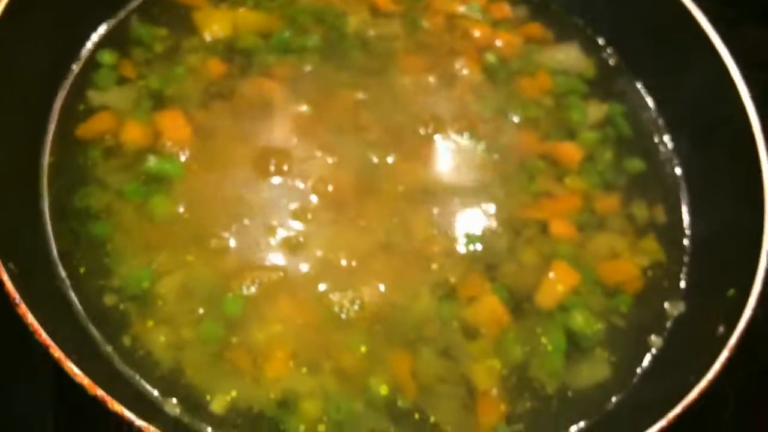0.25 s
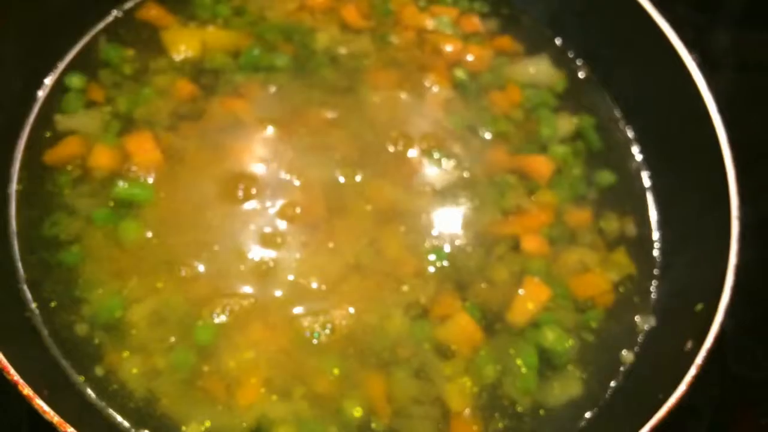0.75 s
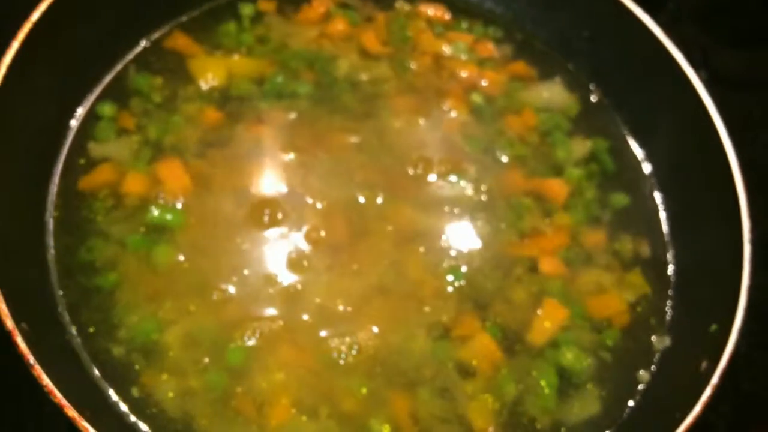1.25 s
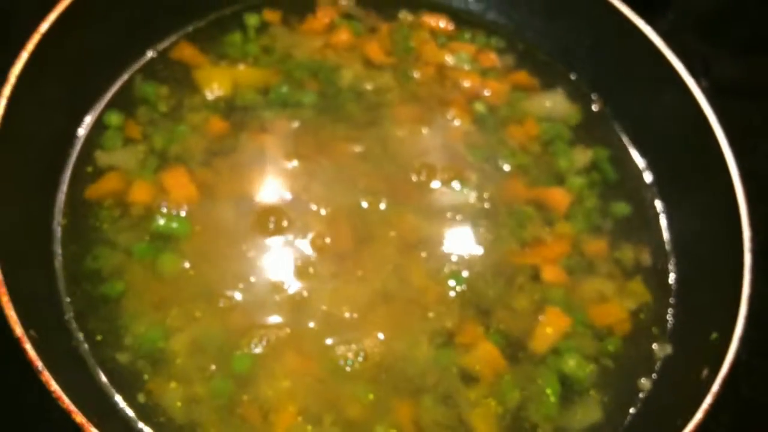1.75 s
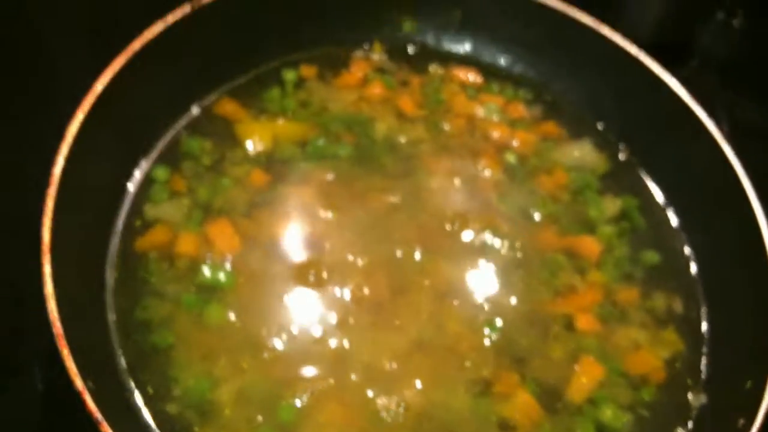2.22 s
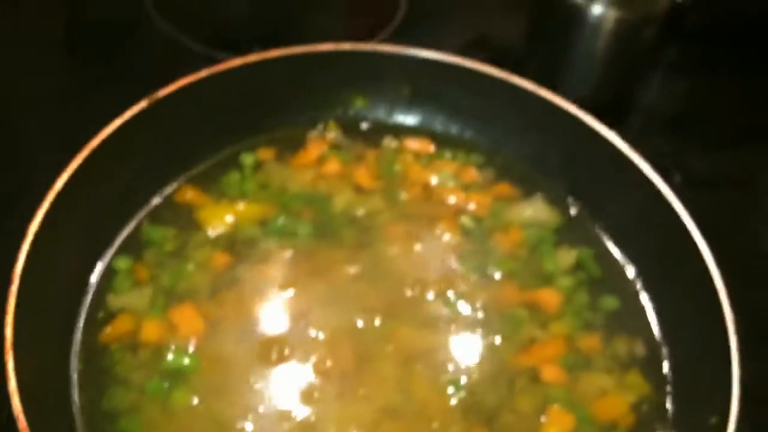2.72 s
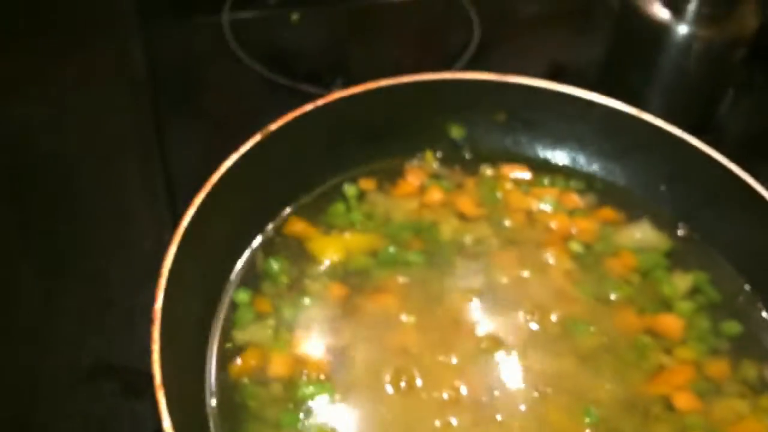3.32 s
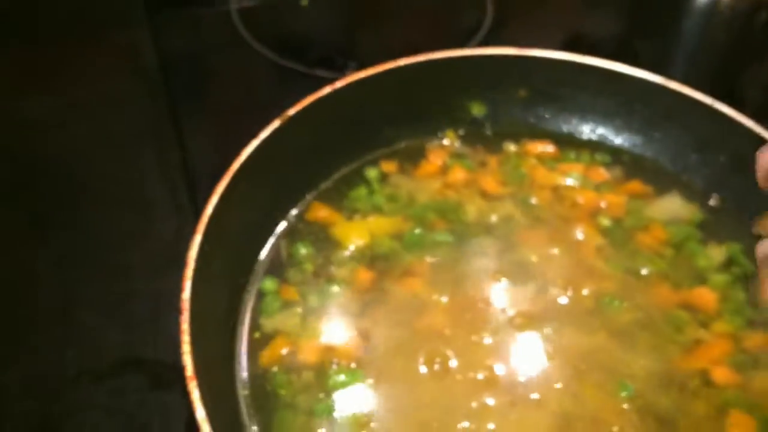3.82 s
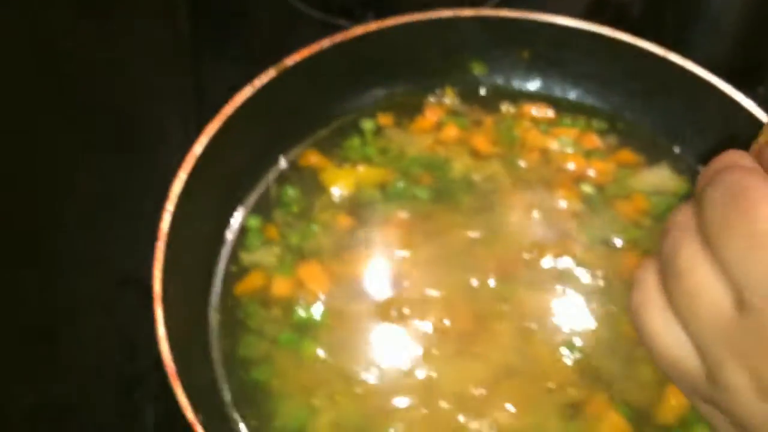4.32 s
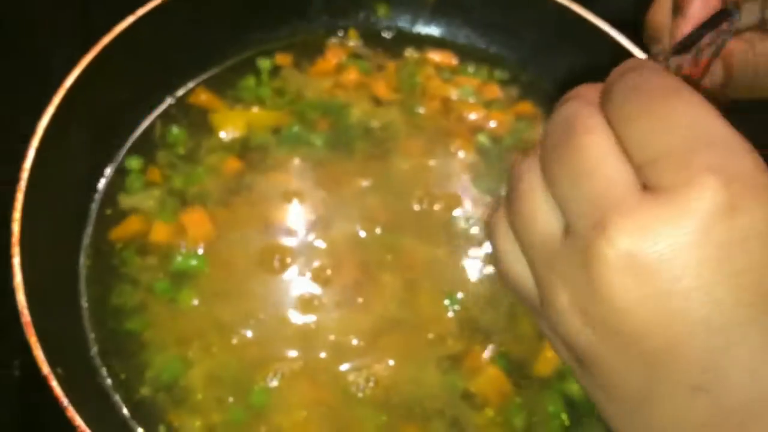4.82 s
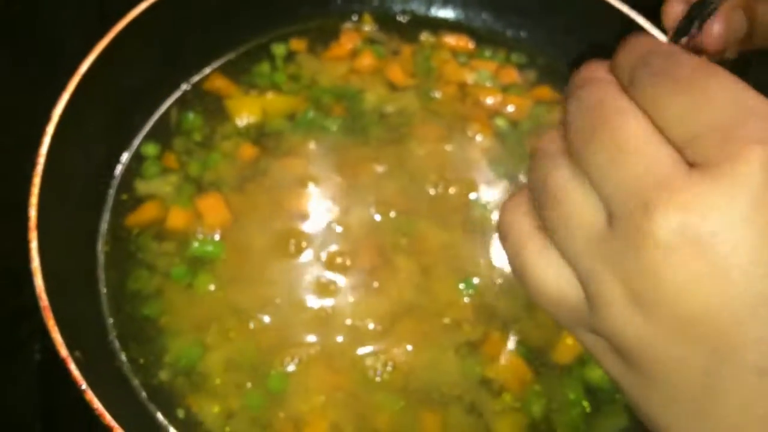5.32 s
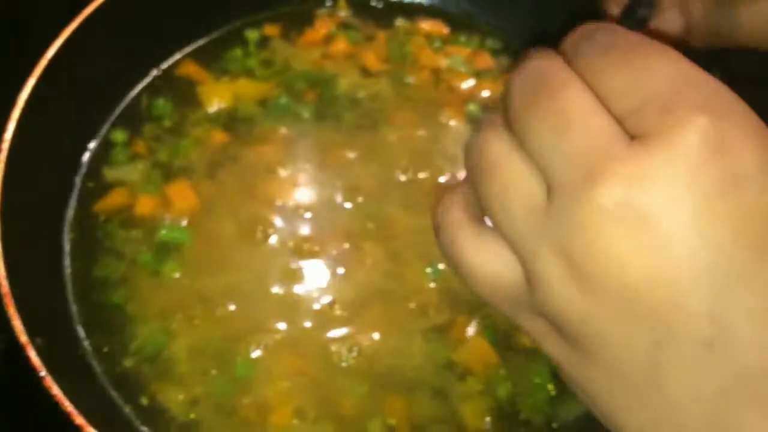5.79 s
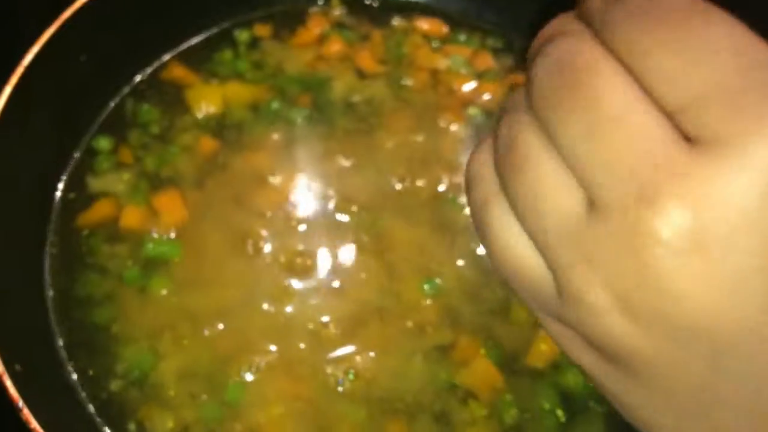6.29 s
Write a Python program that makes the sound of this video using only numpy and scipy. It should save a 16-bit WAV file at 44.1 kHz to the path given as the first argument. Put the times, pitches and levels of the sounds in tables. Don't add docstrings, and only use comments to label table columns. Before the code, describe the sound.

Close, slightly rough phone pickup of a foil packet being opened beside a gently bubbling pan. Quiet rumble and faint shoe scuffs, scattered crisp creases, then the loudest moment: hard foil slaps and dull knocks jolting a small tin. After a calmer stretch of rustle and separate clicks, the seam rips in bright snaps, ending with brittle shaking and short room echoes.

```python
import sys
import numpy as np
from scipy import signal
from scipy.fft import rfft, irfft, next_fast_len
from scipy.io import wavfile
from scipy.ndimage import uniform_filter1d, map_coordinates

SR = 44100
rng = np.random.default_rng(int(sys.argv[2]) if len(sys.argv) > 2 else 0)


def generate_wav(signal):
    frames = np.transpose(np.atleast_2d(signal))
    scaled = np.clip(frames, -1, 1) * 32767
    pcm = np.round(scaled).astype(np.int16)
    wavfile.write(sys.argv[1], SR, pcm)


def ratio_of_db(decibels):
    return 10 ** (np.asarray(decibels, float) / 20)


N = 288849
MIDDLE_HZ = 5000

# (time [s], level [dB])
RUMBLE = [(0, -67.5), (1, -69), (1.28, -70), (1.5, -71), (2.5, -65), (5.5, -67.5), (6.1, -71.5)]


def unit(x):
    return x / np.sqrt(np.mean(x ** 2, -1, keepdims=True) + 1e-20)


def along(points, hz):
    f, v = np.transpose(points)
    return np.interp(np.log(hz + 1), np.log(f + 1), v)


def curve(rows):
    s, v = np.transpose(rows)
    return np.interp(np.arange(N) / SR, s, v)


def wobble(rate_hz):
    knots = rng.standard_normal(int(N * rate_hz / SR) + 4)
    return map_coordinates(knots, [np.arange(N) * rate_hz / SR])


def noise(gain, size, count=1):
    spectrum = rfft(rng.standard_normal((count, size)))
    shaped = irfft(spectrum * gain(np.fft.rfftfreq(size, 1 / SR)), size)
    return np.squeeze(unit(shaped))


def modes(table):
    def gain(f):
        total = 0
        for k, (hz, width_hz, db) in enumerate(table):
            damping = 1j * f * width_hz
            total = total + (-1) ** k * ratio_of_db(db) * damping / (hz * hz - f * f + damping)
        return total
    return gain


def decay(t, t60_s):
    return ratio_of_db(-60 * t / t60_s)


def onset(t, rise_s):
    return 1 - np.exp(-t / rise_s)


def fade(t60s, hz, t):
    return decay(t, np.maximum(along(t60s, hz), .01)[:, None])


def add(track, s, sound):
    part = track[round(s * SR):][:len(sound)]
    part += sound[:len(part)]


def kitchen():
    # (frequency [Hz], width [Hz], level [dB])
    hum_lines = [(56.6, 12, -77), (137.3, 7, -76.5), (185.1, 2.3, -71.5)]
    # (frequency [Hz], density [dB per Hz])
    low_colour = [(12, -47.5), (20, -27), (43, 1.5), (187, -6), (211, -13.5), (500, -25), (650, -55.5),
                  (1100, -120)]
    # (frequency [Hz], density [dB per Hz])
    air_colour = [(120, -28), (200, -7), (659, -21), (836, -17), (1000, -17), (1740, -27.5), (13600, -36.5),
                  (16000, -42)]
    size, t = next_fast_len(N), np.arange(N) / SR
    rumble = ratio_of_db(curve(RUMBLE) + 0.8 * wobble(4.4))
    rumble *= noise(lambda f: ratio_of_db(along(low_colour, f)), size)[:N]
    hum = np.zeros(N)
    for hz, width_hz, db in hum_lines:
        unsteady = noise(lambda f: 1 / (1 + ((f - hz) / width_hz) ** 2), size)[:N]
        steady = ratio_of_db(1) * np.sin(2 * np.pi * hz * t)
        hum += ratio_of_db(db) * (0.65 * unsteady + steady)
    air = ratio_of_db(curve(RUMBLE) / 2 - 38.0 + 1.2 * wobble(3))
    air *= noise(lambda f: ratio_of_db(along(air_colour, f)), size)[:N]
    return rumble + hum + air


def simmer():
    draw, t = rng.random((400, 3)), np.arange(1024) / SR
    hz = 380 * 5.2 ** draw[:, 1:2]
    bubbles = np.sin(2 * np.pi * hz * t * (1 + 0.0088 * hz * t))
    bubbles *= hz * t * np.exp(-hz * t / 1.6) * ratio_of_db(-14 * draw[:, 2:])
    at = (draw[:, :1] * N).astype(int) + np.arange(len(t))
    track = np.bincount(at.ravel(), bubbles.ravel(), minlength=N)[:N]
    return ratio_of_db(curve(RUMBLE) - 14) * unit(track)


def pan_tones():
    # (time [s], length [s], level [dB], frequency [Hz])
    tones = [(.051, 0.15, -63, 85.1), (.271, .072, -54.5, 112.1), (1.356, .033, -53.1, 201),
             (2.411, .04, -46, 193), (2.703, 0.031, -46, 137.1), (2.792, 0.074, -50.1, 113.1),
             (2.861, .068, -48, 166.1), (3.187, .015, -61, 1051), (3.189, .018, -65, 1394),
             (3.201, .036, -62, 316), (3.422, .079, -57.5, 75.1), (3.601, .071, -62, 80.1),
             (4.001, .081, -66, 321), (4.561, .078, -70.5, 351), (4.971, .071, -57.5, 72.5),
             (5.03, 0.045, -71, 628)]
    out, t = np.zeros(N), np.arange(8192) / SR
    for s, length_s, db, hz in tones:
        swell = np.sin(np.pi * np.minimum(t / length_s, 1))
        add(out, s, ratio_of_db(db) * swell * np.sin(2 * np.pi * hz * t * (1 - .03 * t)))
    return out


def scuffs():
    # (time [s], length [s], level [dB])
    slides = [
        (0, 0.031, -61.5),
        (0.103, 0.054, -69),
        (0.215, 0.15, -65.5),
        (0.505, 0.22, -68.5),
        (0.681, 0.17, -73),
        (1.1, 0.16, -72),
        (1.416, 0.072, -60),
        (1.905, .08, -77),
        (3.183, 0.088, -63.5),
    ]
    # (frequency [Hz], width [Hz], level [dB])
    sole = [(1910, 420, 2.5), (2470, 410, 0.5), (3150, 390, -2.5), (4300, 130, -7), (6000, 160, -3)]
    out, t = np.zeros(N), np.arange(16384) / SR
    for s, length_s, db in slides:
        envelope = ratio_of_db(db - 17 * t / length_s) * onset(t, 0.0084)
        add(out, s, envelope * noise(modes(sole), len(t)))
    return out


def knocks():
    # (time [s], thump level [dB], thump frequency [Hz], board level [dB], t60 [s])
    blows = [(0.261, -40, 237, -14, 0.042), (1.212, -43.5, 280, -17, 0.14), (1.262, -42, 280, -20, 0.077),
             (1.329, -41, 280, -9.5, 0.097), (2.4008, -36, 173, 2, 0.39), (2.425, -39, 205, 0.5, 0.34),
             (2.488, -40.5, 165, 13.5, 0.47), (2.519, -39, 304, 6.5, 0.26), (2.719, -26.5, 207, 3.5, 0.063),
             (2.735, -23.5, 145, 1.5, 0.15), (2.741, -33.5, 101, -16, 0.22), (2.777, -41, 328, 5, 0.066),
             (2.861, -46.5, 150, -16.5, 0.11), (3.184, -53.5, 314, -0.5, 0.42),
             (3.449, -44.5, 183, -29, 0.12), (3.943, -42.5, 113, -15.5, 0.13),
             (5.178, -57, 840, 5.5, 0.087), (5.365, -49, 466, -12, 0.092), (5.424, -47.5, 248, -25, 0.11),
             (5.536, -57, 694, 4, 0.16), (5.808, -52, 245, 8.5, 0.094), (6.368, -59, 474, 9, 0.16)]
    # (frequency [Hz], width [Hz], level [dB])
    board_modes = [(490, 174, -4), (676, 114, -0.5), (840, 111.5, -2.5), (940, 64, -6), (1620, 87, -24)]
    # (frequency [Hz], width [Hz], level [dB])
    room_modes = [(116, 51, -10.5), (165, 38.5, 1.5), (280, 177, -8.5)]
    out, t = np.zeros(N), np.arange(16384) / SR
    for s, db, hz, board_db, t60_s in blows:
        thump = np.sin(2 * np.pi * hz * t) * decay(t, 0.49 * t60_s) * onset(t, 0.0022)
        board = np.zeros(len(t))
        for mode_hz, width_hz, mode_db in board_modes:
            level = ratio_of_db(mode_db + rng.normal(0, 1)) * decay(t, 0.12 * t60_s + 2 / width_hz)
            board += level * np.sin(2 * np.pi * mode_hz * rng.normal(1, 0.011) * t)
        board *= 0.52 * ratio_of_db(board_db) * onset(t, 0.00093)
        low = noise(modes(room_modes), len(t)) * decay(t, 0.16 + t60_s) * onset(t, 0.0044)
        mid = noise(modes(board_modes), len(t))
        mid *= decay(t, 0.6 * t60_s) + 0.064 * decay(t, 0.284)
        murmur = (0.27 * low + 0.33 * ratio_of_db(board_db) * mid) * onset(t, 0.0017)
        add(out, s, ratio_of_db(db + 1.0) * (thump + board + murmur))
    return out


def tin():
    # (frequency [Hz], level [dB], t60 [s])
    tin_modes = [(684, -3, 0.098), (3000, -6, 0.1), (4000, -14, .1), (4136, -4, 0.077), (4635, -14, 0.072),
                 (4970, -7.5, 0.074), (6000, -4, .08), (6900, -5, .08), (7420, -12, 0.09)]
    # (time [s], level [dB], frequency struck best [Hz])
    jolts = [
        (2.4016, -36.5, 4160),
        (2.4254, -40, 4060),
        (2.488, -30.5, 4030),
        (2.519, -30, 5000),
        (2.7385, -28.5, 727),
        (2.7195, -43, 940),
    ]
    out, t = np.zeros(N), np.arange(8192) / SR
    for s, db, best_hz in jolts:
        ring = np.sin(2 * np.pi * best_hz * t) * decay(t, .045)
        for hz, level_db, t60_s in tin_modes:
            octaves_off = abs(np.log2(hz / best_hz))
            tone = np.sin(2 * np.pi * (hz * t + rng.random()))
            ring += ratio_of_db(level_db - 8.8 * octaves_off) * decay(t, t60_s) * tone
        add(out, s, ratio_of_db(db) * ring * onset(t, 0.00091))
    return out


def powder():
    # (frequency [Hz], density [dB per Hz])
    grain_colour = [(400, -31), (900, -5), (1700, -4.5), (2400, -13.5), (6000, -32)]
    start_s, rise_s, fall_s, level_db = 3.59, .04, .11, -52.5
    out, t = np.zeros(N), np.arange(16384) / SR
    envelope = onset(t, rise_s) ** 2 * np.exp(-t / fall_s)
    swish = noise(lambda f: ratio_of_db(along(grain_colour, f)), len(t))
    add(out, start_s, ratio_of_db(level_db) * envelope * swish)
    return out


def rustle():
    # (time [s], level [dB])
    movement = [(0.0, -74), (0.8, -68), (1.12, -77), (1.45, -64), (1.62, -73), (1.67, -66), (1.75, -78),
                (1.87, -62), (2.06, -62), (2.26, -73), (2.61, -63.5), (2.98, -71), (3.45, -64), (4.74, -66),
                (5.1, -73), (5.5, -65), (5.84, -71), (6.02, -66.5), (6.55, -67.5)]
    # (frequency [Hz], density [dB per Hz])
    foil_colour = [(1000, -1.5), (2200, 4.5), (4000, 1.5), (8000, 0), (15000, -4)]
    ticks_per_s = 900
    ticks = (rng.random(N) < ticks_per_s / SR) * ratio_of_db(3 * rng.exponential(size=N))
    spray = signal.lfilter([1], [1, -.96], ticks)
    gate = unit(2.4 + unit(spray)) * ratio_of_db(0.75 * wobble(29))
    hiss = noise(lambda f: ratio_of_db(along(foil_colour, f)), next_fast_len(N))[:N]
    return ratio_of_db(curve(movement) - 5.0) * gate * hiss


def panel_rings():
    # (time [s], level [dB], frequency [Hz])
    panels = [(0.9644, -37, 5500), (1.298, -45, 8480), (2.0178, -40, 3230), (2.0178, -32, 2560),
              (2.0254, -32, 2600), (2.0254, -34, 5960), (2.4035, -31, 664), (2.4017, -31, 4640),
              (2.4257, -34, 4010), (2.4878, -23.5, 1690), (2.4878, -15.5, 4000), (2.5185, -15, 6970),
              (2.5185, -17.5, 4850), (2.7281, -36, 2370), (2.7355, -31, 3640), (2.7355, -26, 1540),
              (2.7489, -31, 6700), (2.7489, -36, 2320), (2.7589, -35, 2130), (2.775, -41, 1280),
              (3.5067, -35, 3580), (3.5619, -28, 6200), (3.5619, -31, 3730), (3.589, -35, 6500),
              (3.589, -31.5, 3570), (3.9115, -34, 1820), (3.9197, -38, 3180), (3.9197, -29.5, 6150),
              (4.428, -29.5, 5600), (4.4282, -24, 3220), (4.4302, -41, 3300), (4.8151, -36, 9560),
              (4.8151, -30, 8460), (4.8633, -36, 3470), (4.343, -47, 1680), (5.2583, -20.5, 5970),
              (5.2927, -36, 2660), (5.2927, -30, 3870), (5.3127, -22.5, 2550), (5.3273, -25, 7960),
              (5.3273, -26.5, 3580), (5.4205, -37, 6600), (5.6406, -21, 7700), (5.6406, -19, 8700),
              (5.6756, -25, 8000), (5.6756, -24, 7200), (5.6997, -39, 4000), (5.7655, -32, 6850),
              (5.7655, -32, 7800), (5.8095, -24, 5480), (5.8095, -24, 6200), (5.9014, -35, 5900),
              (5.9014, -32.5, 7630), (6.2405, -34, 2370), (6.2507, -34, 3000), (6.2505, -36, 4280),
              (6.3707, -35.5, 4440), (6.4519, -29, 3550), (6.4519, -32, 4070), (6.4947, -31, 7800)]
    out, t = np.zeros(N), np.arange(1024) / SR
    for s, db, hz in panels:
        envelope = decay(t, 0.0089 + 13 / hz) * onset(t, 0.00024)
        add(out, s, ratio_of_db(db + 0.5) * envelope * np.sin(2 * np.pi * hz * t))
    return out


def flicks():
    # (time [s], peak level [dB], foil resonance [Hz])
    clicks = [(0.863, -37, 4900), (0.9667, -35, 4160), (1.2423, -38, 9600), (1.88, -40, 14100),
              (2.0201, -20, 4500), (2.03, -27, 4300), (2.172, -45, 5130), (2.4925, -21, 2220),
              (2.5208, -24, 4700), (2.5228, -11, 5100), (2.536, -26, 2800), (2.581, -43, 4600),
              (2.7198, -33, 1000), (2.7396, -30, 895), (2.759, -39, 2300), (2.7642, -38, 900),
              (2.776, -34, 1620), (2.794, -47, 1700), (3.0053, -55, 7000), (3.5661, -22.5, 3320),
              (3.574, -40, 2920), (3.904, -55, 2900), (3.9057, -43, 4800), (3.944, -39, 3400),
              (4.114, -46, 10000), (4.246, -50, 2600), (4.8863, -40, 6500), (5.181, -32, 6900),
              (5.2635, -31, 6000), (5.2702, -37, 6800), (5.2873, -40, 6700), (5.302, -37, 7700),
              (5.339, -38, 6600), (5.3682, -29, 3730), (5.426, -37, 6300), (5.654, -36, 3800),
              (5.659, -36, 6000), (5.664, -32, 4000), (5.7585, -36, 3200), (5.7626, -31, 2800),
              (5.8083, -23.5, 2220), (5.826, -35, 2610), (5.9187, -46, 2480), (6.2604, -34, 5600),
              (6.376, -41, 6800), (6.4536, -41, 4080), (6.461, -35, 5000), (6.4648, -37, 5000)]
    s, db, hz = np.transpose(clicks)[:, :, None]
    t = np.arange(512) / SR

    def edge_gain(f):
        broad = 0.19 / (1 + (f / (3.5 * hz)) ** 4)
        peak = 1 / (1 + ((f - hz) / (0.47 * hz)) ** 2)
        return f / (f + 2500) * (broad + peak)

    edge = noise(edge_gain, len(t), count=len(s))
    click = 0.53 * edge + 0.9 * np.sin(2 * np.pi * hz * t)
    click *= decay(t, 0.0043 + 6 / hz) * onset(t, 0.000095)
    out = np.zeros(N)
    for k in range(len(s)):
        add(out, s[k, 0], ratio_of_db(db[k]) * click[k])
    return out


def creases():
    # (time [s], crack level [dB], foil resonance [Hz], body [dB], rattle re crack [dB])
    pickup = [(0.8199, -41, 5070, -5, -8.5), (0.8586, -35.5, 6400, 9, -14), (.9642, -31.5, 5540, 2, -13.5),
              (1.2984, -32, 8140, -12, -14), (1.4365, -35, 9400, -22, -12), (1.878, -37, 7000, -25, -14),
              (1.976, -41, 5000, -6, -11), (2.013, -37.5, 9000, -10, 3), (2.0189, -26, 3470, 11, -9),
              (2.0256, -20.5, 3970, -31, -17), (2.1476, -33, 10400, -2.5, -9.5),
              (2.1767, -36.5, 9600, -34, -22), (2.4009, -28, 4500, -9, -10), (2.425, -38, 4120, -17, -9),
              (2.488, -14.5, 3940, 1, -6), (2.519, -16.5, 5130, 1.5, -5.5), (2.7282, -28.5, 8950, -9, -38),
              (2.7356, -24, 2010, 12, -6.5), (2.749, -32.5, 7900, -7, -32), (2.7698, -38, 7900, -14, -32),
              (2.7852, -40.5, 8500, -6, -32), (3.0985, -39.5, 12500, -13.5, -15.5)]
    pinch = [(3.4565, -39, 7130, -1, -6.5), (3.5067, -31.5, 9500, 1, -10), (3.562, -27, 8600, 4.5, -6.5),
             (3.566, -62, 1640, -10, -24), (3.5893, -26.5, 8400, 2, -16), (3.911, -37.5, 1860, 0, -12),
             (3.92, -37, 4200, 2.5, -6.5), (3.947, -39, 4500, -2, -8), (4.2488, -35.5, 6900, 4.5, -14),
             (4.3127, -40.5, 1830, 2, -13), (4.3365, -32, 10000, -4, -15.5), (4.4285, -27.5, 3200, -5, -13),
             (4.511, -41.5, 1420, -1, -12), (4.6314, -42, 6400, 2, -13.5), (4.6648, -39, 3270, 0, -11.5),
             (4.78, -32, 1740, 2, -11), (4.815, -27.5, 13100, -34, -11), (4.8208, -38, 8600, 10.5, -12.5),
             (4.864, -25.5, 8300, -10.5, -10.5), (4.9122, -23, 11500, -12, -15.5),
             (4.993, -42, 4460, 1.5, -10.5), (5.0346, -41.5, 11400, -10, -11.5),
             (5.1785, -34, 7600, 0, -13.5)]
    rip = [(5.2588, -23, 6800, 3, -13), (5.279, -38.5, 7880, 11, -16), (5.293, -22.5, 6000, 3, -12.5),
           (5.313, -26.5, 2680, -3, -9.5), (5.3275, -20, 2650, -4, -12.5), (5.3339, -25, 11300, 9, -27),
           (5.3657, -33.5, 2660, 4, -7), (5.3949, -34, 8050, 4, -8), (5.407, -44, 2470, 15, -24),
           (5.421, -30, 7250, 2.5, -14), (5.6411, -19, 1920, -1.5, -11.5), (5.6703, -30.5, 4600, -5.5, 0.5),
           (5.6761, -18.5, 4300, -1.5, -24), (5.7, -35, 4000, -8, -16), (5.7103, -35.5, 4570, 7, -6.5),
           (5.724, -38, 9700, 3, -27), (5.7657, -26.5, 7700, 3.5, -13.5), (5.8099, -18, 7000, 4.5, -13),
           (5.9023, -27, 5470, 7, -11), (5.9213, -40, 2360, -19, -24)]
    shake = [
        (6.038, -41.5, 4700, -1.5, -21),
        (6.1966, -34.5, 6600, -14, -12),
        (6.2184, -38.5, 2530, 3, -10),
        (6.2335, -34, 7200, -3, -17),
        (6.2403, -43, 2330, 10, -3),
        (6.2503, -22.5, 4150, -14, -12.5),
        (6.3168, -47.5, 1570, 29, -25),
        (6.371, -29.5, 9350, -5, -13.5),
        (6.4523, -25.5, 4270, -9, -13),
        (6.495, -30.5, 8000, -5, -12),
    ]
    # (edge [dB], edge per dB of harder crack [dB])
    edge_lift = [
        (-4, 0),
        (-1.05, 0),
        (1, 0.14),
        (-3.5, 0.2),
    ]
    # (time [s], crack level [dB], foil resonance [Hz])
    ticks = [(.4998, -77, 1960), (1.2195, -48.5, 14000), (1.502, -50, 14380), (1.792, -60, 1180),
             (2.172, -47, 5430), (2.252, -54, 5800), (2.3197, -50, 4780), (2.662, -46.5, 2530),
             (2.8731, -48.5, 3990), (3.289, -54, 3980), (3.8468, -56, 1830), (4.0964, -42, 3340),
             (4.1158, -44.5, 9900), (4.1722, -56, 8740), (4.3854, -56, 12790), (4.643, -49.5, 3020),
             (4.7074, -44.5, 11800), (4.7429, -57, 1300), (5.0015, -42, 13400), (5.0109, -45, 6900),
             (5.147, -54, 4670), (5.2203, -47.5, 7950), (5.236, -49, 2580), (5.5296, -50.5, 2870),
             (5.9439, -58, 2280), (5.9622, -44.5, 4100), (5.9794, -54, 9730), (5.9959, -47, 8400),
             (6.161, -48.5, 8800), (6.513, -50, 6460)]
    # (time [s], crack level [dB], foil resonance [Hz])
    scrunches = [(1.219, -52, 14000), (1.2407, -49, 7100), (1.2468, -45, 12800), (1.306, -62, 6650),
                 (1.4835, -55.5, 6330), (1.5123, -61, 7800), (1.6745, -57, 7300), (1.846, -57.5, 4360),
                 (1.8765, -40, 11400), (1.9669, -47, 6060), (2.213, -57, 14170), (2.4354, -41, 4800),
                 (2.6813, -57.5, 2580), (3.0903, -60.5, 1820), (3.8775, -57, 1720), (4.0513, -55, 3330),
                 (4.3005, -55, 3200), (5.1701, -57, 1640), (5.542, -67, 1560), (5.608, -61, 13050),
                 (5.7571, -43.5, 2420), (5.7794, -52, 8400), (6.0156, -56, 4200), (6.3565, -52, 2120)]
    # (time [s], crack level [dB], foil resonance [Hz], rattle re crack [dB])
    aftersnaps = [
        (1.231, -51, 4500, -9),
        (1.269, -59, 4500, 1),
        (4.432, -45.5, 3250, 4),
        (1.882, -39, 9150, -20),
        (1.947, -57, 4300, -4),
        (2.91, -60.5, 8930, -1),
    ]
    firm_db, tick_rattle_db, scrunch_rattle_db = -29.5, -11, -0.7

    def body(hz):
        return -1.5 - 4 * np.log2(hz / MIDDLE_HZ)

    folds = []
    for rows, (lift_db, harder) in zip((pickup, pinch, rip, shake), edge_lift):
        folds += [(*row, lift_db + harder * (row[1] - firm_db)) for row in rows]
    for rows, rattle_db in ((ticks, tick_rattle_db), (scrunches, scrunch_rattle_db)):
        folds += [(s, db, hz, body(hz), rattle_db, 0) for s, db, hz in rows]
    folds += [(s, db, hz, body(hz), rattle_db, 0) for s, db, hz, rattle_db in aftersnaps]
    s, db, hz, body_db, rattle_db, lift_db = np.transpose(folds)[:, :, None]
    edge_db = lift_db - 3 + 3 * np.log2(hz / MIDDLE_HZ)
    return s, db, hz, body_db, edge_db, rattle_db


def snaps():
    # (frequency [Hz], t60 [s])
    rattle_t60 = [(500, 0.0876), (2000, 0.081), (6000, 0.072), (15000, 0.053)]
    # (frequency [Hz], t60 [s])
    kitchen_t60 = [(300, 0.58), (2000, 0.31), (6000, 0.28), (15000, 0.19)]
    s, db, hz, body_db, edge_db, rattle_db = creases()
    count, t = len(s), np.arange(12288) / SR
    ts = t[:1024]
    shapes = rng.standard_normal((count, 40))

    def colour(f, peak):
        slope = along([(350, -32.5), (900, -10), (1150, -13), (1600, -4.5), (2000, -2.0),
                       (11000, 1.0), (16000, -1.0)], f)
        tilt = body_db * along([(2000, 1), (5000, 0)], f) + edge_db * along([(5000, 0), (11000, 1)], f)
        bands = 1.8 * shapes[:, (np.sqrt(f / SR) * 55).astype(int)]
        resonance = 1 + peak / (1 + ((f - hz) / (0.077 * hz + 100)) ** 2)
        return ratio_of_db(slope + tilt + bands) * resonance

    crack = noise(lambda f: colour(f, 2.0), len(ts), count=count)
    crack *= (decay(ts, 0.009) + 1.6 * decay(ts, 0.006)) * onset(ts, .0001)
    crack /= np.sqrt(np.mean(crack[:, :44] ** 2, 1, keepdims=True))
    ring = np.sin(2 * np.pi * hz * ts) * decay(ts, 0.0019 + 20 / hz) * onset(ts, 0.00021)
    crack += 0.55 * (MIDDLE_HZ / hz) ** .25 * ring
    u = (ts - .0004) / .00003
    crack -= 1.8 * np.minimum(hz / MIDDLE_HZ, 1) * (1 - u ** 2) * np.exp(-u ** 2 / 2)

    loose = ratio_of_db(np.minimum(rattle_db, 3))[:, None]
    source = noise(lambda f: colour(f, np.minimum(3000 / hz, .9)), len(t), count=count)
    f, steps, z = signal.stft(source, SR, nperseg=128)
    walls = fade(kitchen_t60, f, steps) * onset(steps, 0.012)
    flap = loose * decay(steps, 0.032)
    envelope = loose * (fade(rattle_t60, f, steps) + flap + 0.31 * walls) + 0.0033 * walls
    tail = signal.istft(z * envelope, SR, nperseg=128)[1][:, :len(t)]
    chance = rng.standard_normal(tail.shape)
    clumps = unit(uniform_filter1d(chance, size=70))
    grains = unit(uniform_filter1d(chance, size=16))
    tail *= ratio_of_db(2.1 * clumps + 1.5 * grains)
    tail *= onset(t, 0.00088 + 0.0033 * loose[:, 0] ** 2)

    out = np.zeros(N)
    for k in range(count):
        add(out, s[k, 0] - .0003, ratio_of_db(db[k] - 2.5) * crack[k])
        add(out, s[k, 0] - .0003, ratio_of_db(db[k] - 2.5) * tail[k])
    return signal.lfilter(*signal.butter(3, 430, "high", fs=SR), out)


def scene():
    background = kitchen() + simmer() + pan_tones() + scuffs()
    worktop = knocks() + tin()
    sachet = powder() + rustle() + panel_rings() + flicks() + snaps()
    return (background + worktop + sachet)[None]


def roll_off(x):
    return signal.sosfilt(signal.butter(12, 16530, fs=SR, output="sos"), x)


def record(dry):
    size = next_fast_len(N)
    squeezed = dry / (1 + np.abs(dry / .36) ** 4) ** .25
    edge_db = along([(15250, 0), (15550, -34), (16600, -36), (16750, -90)], np.fft.rfftfreq(size, 1 / SR))
    mix = irfft(rfft(squeezed, size) * ratio_of_db(edge_db), size)[:, :N]
    return roll_off(mix)


dry = scene()
out = record(dry)
generate_wav(out)
```